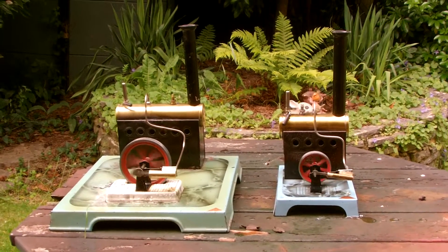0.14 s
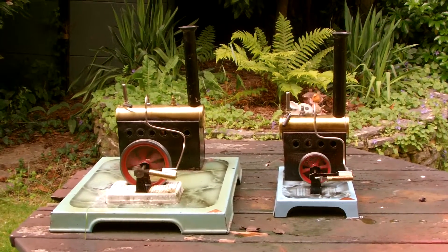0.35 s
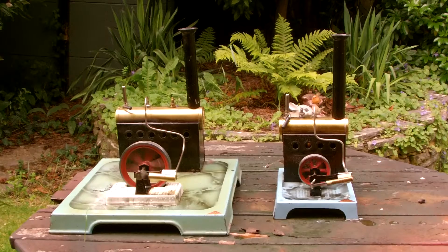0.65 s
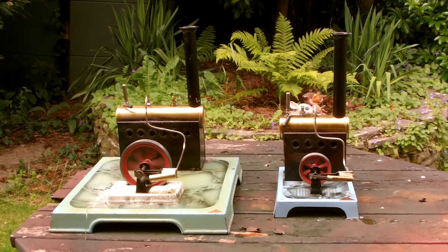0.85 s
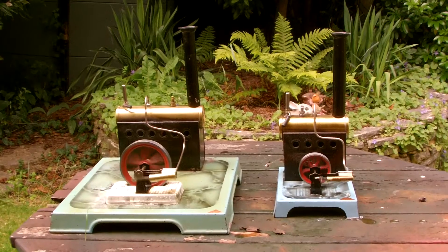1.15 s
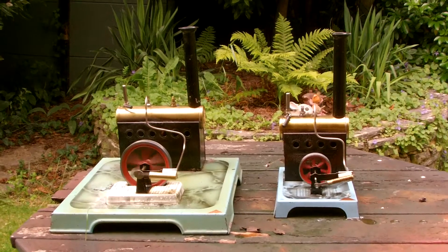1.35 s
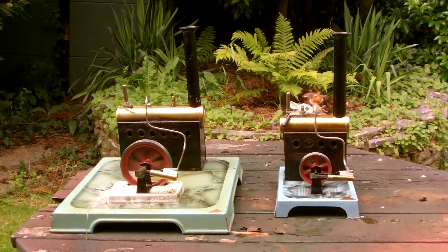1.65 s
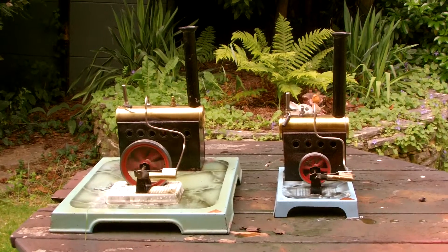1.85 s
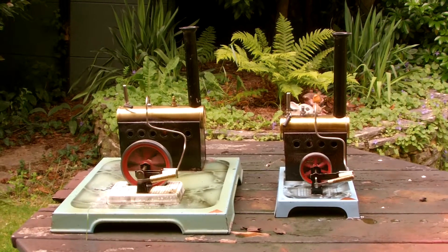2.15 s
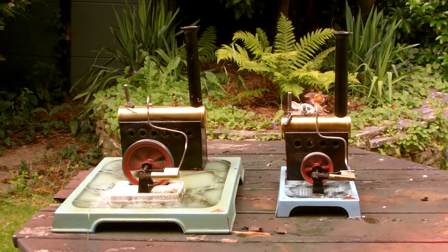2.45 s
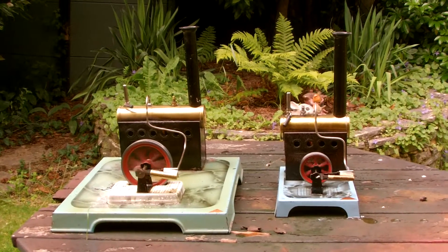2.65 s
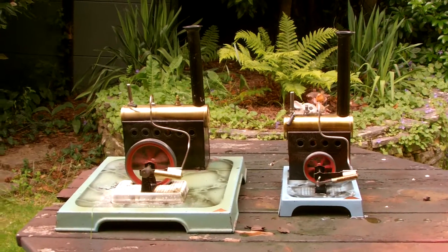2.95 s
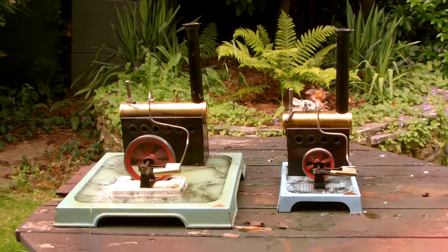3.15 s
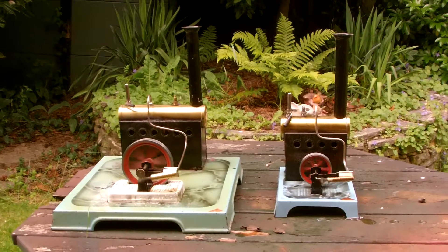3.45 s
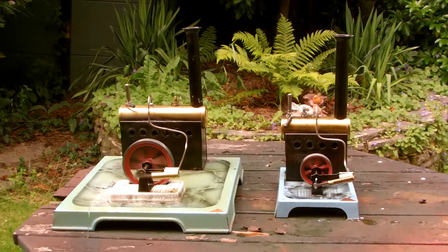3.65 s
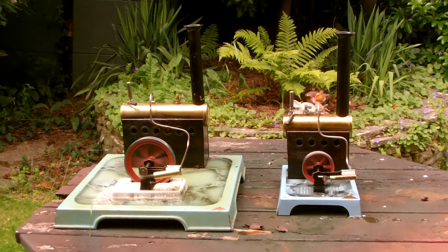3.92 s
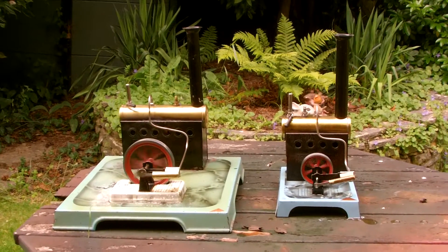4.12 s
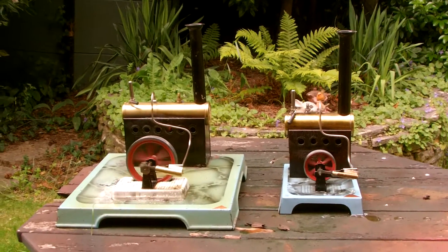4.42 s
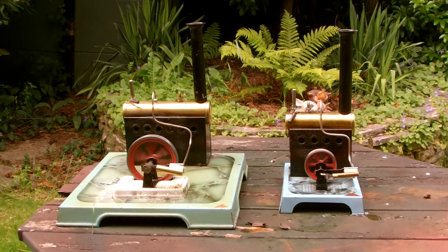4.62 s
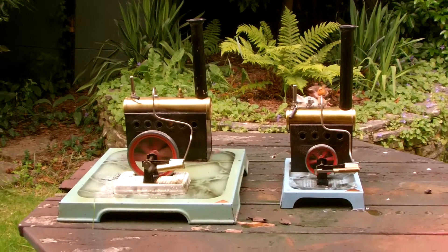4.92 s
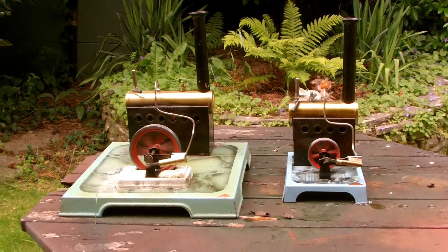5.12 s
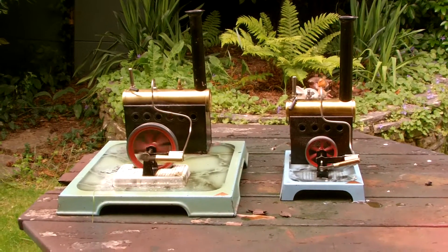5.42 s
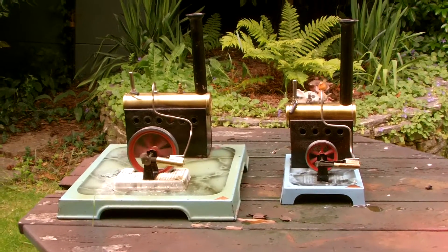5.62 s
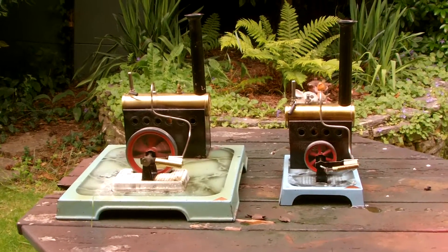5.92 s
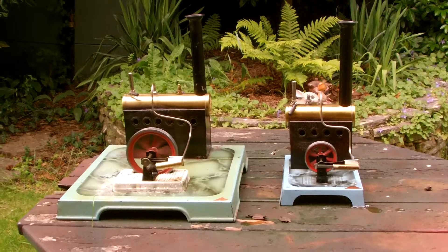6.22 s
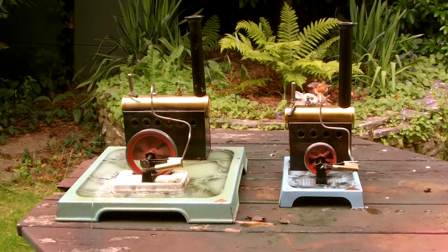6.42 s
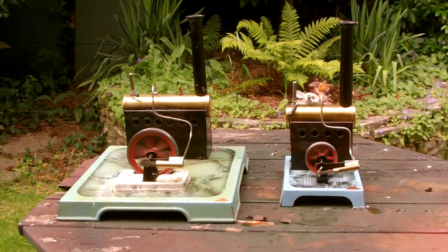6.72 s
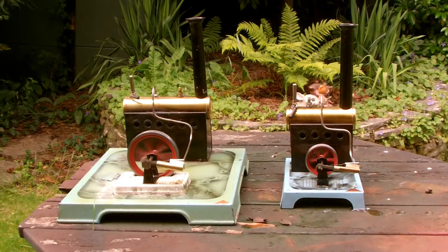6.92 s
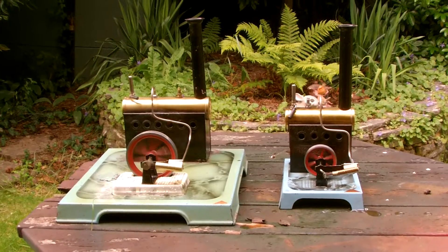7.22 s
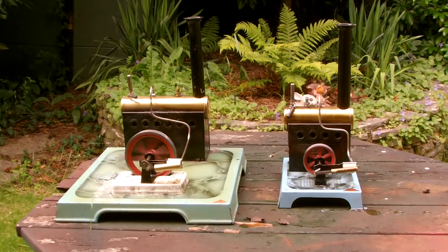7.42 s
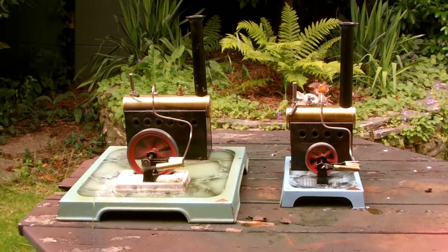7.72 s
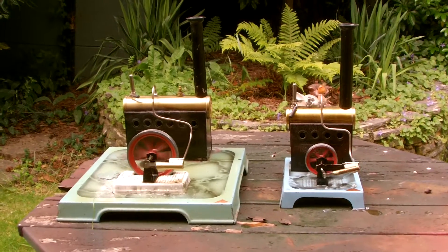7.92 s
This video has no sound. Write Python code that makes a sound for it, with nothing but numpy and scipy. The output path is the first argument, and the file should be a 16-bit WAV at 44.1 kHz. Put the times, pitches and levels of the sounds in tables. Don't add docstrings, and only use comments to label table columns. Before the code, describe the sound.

Rapid metallic chatter of a miniature steam engine on a hollow tin base, about nineteen beats a second, hissing steam, faint garden bird.

```python
import sys
import numpy as np
from scipy import signal
from scipy.fft import rfft, irfft, next_fast_len
from scipy.io import wavfile

SR = 44100
rng = np.random.default_rng(int(sys.argv[2]) if len(sys.argv) > 2 else 0)


def wav_out(sig):
    wavfile.write(sys.argv[1], SR, np.round(np.clip(np.atleast_2d(sig).T, -1, 1) * 32767).astype(np.int16))


def voltage_ratio(decibels):
    exponent = np.asarray(decibels, float) / 20
    return 10 ** exponent


N = 355439

# (time [s], level [dB])
RUMBLE_LEVEL = [(0.0, -71), (0.38, -100), (1.1, -74.5), (1.93, -90), (3.48, -76), (3.7, -78), (4.13, -74),
                (4.27, -72), (5.09, -69.5), (6.22, -75.5), (7.92, -73), (8.06, -89)]
# (frequency [Hz], density [dB/Hz])
RUMBLE_SPECTRUM = [(40, -14), (120, -6), (250, -5), (400, -4), (600, -8), (1000, -30)]
# (frequency [Hz], density [dB/Hz])
AIR_SPECTRUM = [(20, 0), (60, -11), (200, -13.5), (600, -19), (900, -40)]
# (time [s], frequency [Hz], level [dB])
INSECT = [(4.3, 250, -85), (4.48, 250, -73), (4.65, 240, -75), (4.85, 250, -82), (5.1, 252, -71),
          (5.3, 268, -70), (5.45, 255, -79), (5.6, 262, -74), (5.8, 250, -85)]
# (time [s], frequency [Hz], level [dB])
BIRD_NOTES = [
    [(5.34, 2080, -64), (5.37, 2100, -49), (5.41, 2080, -66)],
    [(5.63, 2100, -64), (5.67, 2100, -60), (5.74, 2150, -53), (5.785, 2220, -50)],
    [(5.785, 2400, -58), (5.81, 2160, -47), (5.85, 1890, -58), (5.87, 1800, -66)],
    [(6.1, 2680, -64), (6.115, 2640, -50), (6.145, 2460, -49), (6.19, 2370, -53), (6.25, 2245, -52),
     (6.31, 2130, -55), (6.33, 2100, -77)],
    [(6.745, 2210, -66), (6.77, 2190, -48), (6.825, 2093, -57), (6.86, 2196, -53), (6.92, 2215, -51),
     (6.95, 2200, -66)],
]
BIRD_FLUTTER = [.02, .06, .015, .02, .012]

# (frequency [Hz], density [dB/Hz])
BOILER_SPECTRUM = [(180, -43), (300, -20), (593, -15), (801, 2), (900, -27), (1010, -2), (1970, -14.5),
                   (3580, -19.5), (7200, -18.5), (9880, -21), (16000, -27.5)]
# (time [s], level [dB])
SPIT_EVENT = (2.97, -29)
# (frequency [Hz], density [dB/Hz])
SPIT_SPECTRUM = [(9000, -28), (13000, 2), (16000, -14)]

# (turn number [1], time of pin click [s])
CRANK_PROGRESS = [(0, -.0036), (21, 1.0948), (41, 2.1405), (61, 3.1835), (81, 4.2257), (101, 5.2673),
                  (121, 6.3084), (141, 7.3515), (154, 8.0298)]
# (time of first hard turn [s], hard thud [dB], hard clack [dB], soft thud [dB], soft clack [dB])
BOUNCE_RUNS = [(-.055, -25, -33, -31.5, -43), (.519, -26, -35, -27.5, -44),
               (1.095, -27, -39.5, -30.5, -40.5), (1.618, -25.5, -30.5, -28.5, -45.5),
               (2.036, -26.5, -36.5, -28.5, -40), (2.298, -28.5, -46, -30.5, -51),
               (2.402, -26, -41, -26.5, -44), (2.506, -27, -39, -29.5, -51), (2.611, -26, -38, -29.5, -43),
               (3.027, -27.5, -42, -26.5, -38.5), (3.236, -29, -45, -27, -45), (3.34, -26, -32, -29.5, -56),
               (3.913, -25.5, -35, -31.5, -47), (4.33, -25.5, -30.5, -31.5, -50.5),
               (4.954, -28, -37.5, -26, -41), (5.111, -23.5, -47, -25, -40), (5.215, -26, -33, -24.5, -52),
               (5.58, -24.5, -32.5, -29, -33.5), (5.684, -27, -36.5, -30.5, -71),
               (6.361, -26.5, -37, -25, -43), (6.517, -29, -44, -30, -47), (7.142, -23.5, -34.5, -30, -45),
               (7.404, -23.5, -32.5, -32, -67), (7.822, -25.5, -31, -26, -52)]
# (time [s], extra thud [dB], extra clack [dB])
STUMBLE_TURNS = [(.572, -2.5, -7), (.886, -1, 3), (1.356, 6.5, 10), (1.723, -5, -15), (1.775, -1, 7),
                 (1.879, 2, -7), (1.931, -5, -17), (2.767, -2.5, -12), (2.974, -1, 6), (3.34, -3.5, 0.5),
                 (3.809, 3.5, -5), (3.861, 0.8, -9), (3.913, -3, -0.5), (4.278, 1.1, -24), (4.901, -7, 10),
                 (5.372, -2, 14), (5.476, -6.5, -11), (5.527, -4, -7.5), (5.684, 2, 0), (6.517, -3.5, 7),
                 (6.569, -4, -7), (6.673, 5, 2.1), (6.725, 3.5, 12), (6.829, 1, -19), (7.09, -2, -5),
                 (7.299, -1.5, -22), (7.352, -8.5, -42), (7.404, -4, -3.5), (7.56, -1.5, 20),
                 (8.03, -3.5, 3.5)]
# (time [s], extra puff [dB])
WET_TURNS = [(-.003, 1.5), (.519, 0), (1.148, 1.5), (1.356, 5), (1.67, 4.5), (1.931, 3), (2.193, 1.5),
             (2.558, 7), (3.809, 4.5), (4.434, 3), (4.538, 2.5), (5.267, 4.5), (5.32, 12), (5.423, 4.5),
             (5.632, 2.5), (6.621, 5.5), (6.829, 5.5), (7.09, 4.5), (7.247, 5.5), (7.456, 5), (7.664, 5),
             (7.717, 3.5), (7.978, 4), (8.03, 4)]
# (time [s], knock level [dB])
BEARING_PLAY = [(0, -44), (.52, -54), (.8, -54), (1.12, -44), (1.45, -46), (1.9, -44.5), (2.6, -44),
                (3.2, -45.5), (3.85, -55), (4.2, -46.5), (5.0, -51.5), (5.5, -47.5), (6.3, -49),
                (6.55, -56), (7.0, -49), (7.35, -56), (7.65, -46), (8.06, -51)]
# (time [s], thud [dB], clack [dB], puff [dB], knock [dB])
TURN_CHANCE = [.00006, .7, 1.8, .9, 1.8]
PUFF_DB, PUFF_PER_CLACK_DB, SLACK_PER_CLACK_DB = -37.5, 0.077, 0.3

# (delay after pin click [ms], level [dB], brightness [dB/octave], scatter [dB])
SLACK_CONTACTS = [
    (-7.8, 0, 3, 1.2),
    (-3.7, -3, 7, 1.5),
]
PIN_CONTACTS = [
    (.05, 0, 1.1, 0.99),
]
SLAP_CONTACTS = [
    (4.3, -10, 5.7, 0.8),
    (8.7, -8.5, 1.2, 5.7),
    (12.5, -7, 0.9, 3.5),
    (17.5, -31, 1.9, 3.6),
]
FEET_CONTACTS = [
    (.7, -1.5, 0, 1.3),
    (5.7, -6, -3, 2),
]
SLACK_FEET_CONTACTS = [
    (-9.3, 0, 12, 1.5),
]
KNOCK_WANDER_MS = 0.15

# (frequency [Hz], level [dB], t60 [s])
HOLLOW_MODES = [(443.6, -24.5, 0.05), (547.6, -22.5, 0.057), (666.7, -22.5, 0.096), (761, -8, 0.036),
                (800.2, -0.5, 0.034), (995, -3, 0.031), (1076, -12, 0.059), (1216, -23, 0.045)]
# (frequency [Hz], level [dB], t60 [s])
BED_MODES = [(1266, -16.5, 0.034), (1342, -22.5, 0.044), (1540, -12.5, 0.045), (1665, -10.5, 0.024),
             (1756, -16, 0.021), (2110, -11.5, 0.024), (2357, -14, 0.036), (2505, -29, 0.24)]
# (frequency [Hz], level [dB], t60 [s])
BRASS_MODES = [(3080, -4, .035), (3270, -9, .045), (3533, -1, .06), (3800, -7, .045), (4005, -7, .05),
               (4212, -6, .04), (4420, -12, .05), (4708, -7, .055), (4830, -11, .05), (5035, -6.5, .05),
               (5500, -7, .045), (6018, -6.5, .045), (6172, -9, .05), (6480, -9, .045),
               (7920, -18, 0.12), (8600, -15.5, 0.044), (9730, -4, 0.033), (12300, -24, 0.012)]
# (frequency [Hz], density [dB/Hz])
RATTLE_SPECTRUM = [(500, -30), (1200, 16), (2500, -3.5), (4000, 8.5), (6300, -5.5), (7500, -30),
                   (9000, -72.5)]
# (frequency [Hz], density [dB/Hz])
CLACK_SPECTRUM = [(3000, -16), (6000, 2.5), (7400, -7.5), (8700, 6), (11200, 1), (12500, -2), (15500, -12),
                  (17000, -62)]
# (frequency [Hz], density [dB/Hz])
PUFF_SPECTRUM = [(1500, -16.5), (3000, -15), (5500, -3), (7400, -7), (9000, 4.5), (11200, 4.5),
                 (12500, -7.5), (16000, -8.5)]

# (frequency [Hz], difference re sum [dB])
PORT_DIFFERENCE = [(250, -18), (600, -23), (2400, -21.5), (4400, -14.5), (6800, -11), (10000, -10),
                   (15000, -5)]
# (frequency [Hz], left minus right [dB])
PORT_LEAN = [(2400, 0), (4400, -.6), (8100, -2.2), (15000, -3.5)]


def in_time(rows):
    s, *columns = np.transpose(rows)
    return [np.interp(np.arange(N) / SR, s, c) for c in columns]


def shaped(x, points):
    hz, level_db = np.transpose(points)
    size = next_fast_len(N + 2000, real=True)
    bins_hz = np.maximum(np.fft.rfftfreq(size, 1 / SR), 1)
    gain = voltage_ratio(np.interp(np.log(bins_hz), np.log(hz), level_db))
    return irfft(rfft(x, size) * gain, size)[..., :N]


def noise(points, grain_db=0., channels=1):
    white = rng.standard_normal((channels, N))
    grains = voltage_ratio(grain_db * np.minimum(rng.exponential(1, (channels, N)), 5))
    x = shaped(white * grains, points)
    return x / np.std(x)


def drift(rate_hz):
    knots = rng.standard_normal(int(rate_hz * N / SR) + 2)
    return np.interp(np.arange(N) * rate_hz / SR, np.arange(len(knots)), knots)


def high_pass(x, order, hz):
    return signal.sosfilt(signal.butter(order, hz, "high", fs=SR, output="sos"), x)


def clicks(at_s, sizes):
    lead, train = SR // 10, np.full(N + SR // 5, 1e-18)
    np.add.at(train, np.round(at_s * SR).astype(int) + lead, sizes)
    return train


def ring(train, hz, t60_s, order=1):
    r, w = voltage_ratio(-60 / (t60_s * SR)), 2 * np.pi * hz / SR
    for k in range(order):
        resonance = signal.lfilter([0, np.sin(w)], [1, -2 * r * np.cos(w), r * r], train)
        train = resonance * (2 * np.e * (1 - r)) ** k
    return train[SR // 10:SR // 10 + N]


def burst(at_s, level_db, rise_ms, t60_s):
    rise, fall = np.exp(-1000 / (rise_ms * SR)), voltage_ratio(-60 / (t60_s * SR))
    poles = np.convolve([1, -rise], [1, -fall])
    shape = signal.lfilter([1 - rise], poles, clicks(at_s, voltage_ratio(level_db)))
    return shape[SR // 10:SR // 10 + N]


def struck(modes, blows, shake, wander_ms, order=1):
    out = np.zeros(N)
    late = rng.normal(0, 1, (len(blows[0][0]), 8))
    for hz, mode_db, t60_s in modes:
        train, column = np.pad(shake, SR // 10) * voltage_ratio(mode_db), 0
        for at_s, blow_db, contacts in blows:
            for ms, contact_db, bright_db, scatter_db in contacts:
                chance_db = scatter_db * np.clip(rng.normal(0, 1, len(at_s)), -2, 1.5)
                tilt_db = bright_db * np.log2(hz / 1000)
                level_db = blow_db + contact_db + mode_db + tilt_db + chance_db
                hit_s = at_s + (ms + wander_ms * late[:, column]) / 1000
                train = train + clicks(hit_s, voltage_ratio(level_db))
                column += 1
        out += ring(train, hz, t60_s, order)
    return out


def whistle(rows, warble_hz, depth, rough_db):
    start = (rows[0][0] - .01, rows[0][1], -120)
    end = (rows[-1][0] + .01, rows[-1][1], -120)
    hz, level_db = in_time([start, *rows, end])
    hz = hz * (1 + depth * drift(warble_hz))
    level = np.sqrt(2) * voltage_ratio(level_db + rough_db * drift(warble_hz))
    return level * np.sin(2 * np.pi * np.cumsum(hz) / SR)


def air():
    return voltage_ratio(-68.5) * noise(AIR_SPECTRUM, channels=2)


def far_rumble():
    return voltage_ratio(in_time(RUMBLE_LEVEL)[0] + 5.0) * noise(RUMBLE_SPECTRUM)


def insect():
    return whistle(INSECT, warble_hz=25, depth=.012, rough_db=3)


def bird():
    notes = zip(BIRD_NOTES, BIRD_FLUTTER)
    song = sum(whistle(note, warble_hz=130, depth=depth, rough_db=3.5) for note, depth in notes)
    song = song + 0.48 * np.roll(song, 500) + 0.1 * np.roll(song, 1300)
    return song * voltage_ratio(np.array([[.6], [-.6]]))


def boiler():
    at_s, spit_db = np.array(SPIT_EVENT[:1]), SPIT_EVENT[1]
    spit = burst(at_s, spit_db, rise_ms=.1, t60_s=.008) * noise(SPIT_SPECTRUM, channels=2)
    return voltage_ratio(-48.5 + 0.89 * drift(7.3)) * noise(BOILER_SPECTRUM, grain_db=1.0, channels=2) + spit


def turns():
    number, s = np.transpose(CRANK_PROGRESS)
    turn = np.arange(int(number[-1]) + 1)
    at_s = np.interp(turn, number, s)

    def nearest(table):
        event_s = np.array(table)[:, 0]
        return np.round(np.interp(event_s, [-at_s[1], *at_s], [-1, *turn])).astype(int)

    first = nearest(BOUNCE_RUNS)
    run = np.searchsorted(first, turn, side="right") - 1
    hard = (turn - first[run]) % 2 == 0
    run_levels = np.array(BOUNCE_RUNS)[run]
    levels = np.where(hard[:, None], run_levels[:, 1:3], run_levels[:, 3:5])
    levels[nearest(STUMBLE_TURNS)] += np.array(STUMBLE_TURNS)[:, 1:]
    thud_db, clack_db = levels.T
    firm_db = np.maximum(clack_db + 44, -12)
    puff_db = PUFF_DB + PUFF_PER_CLACK_DB * firm_db
    puff_db[nearest(WET_TURNS)] += np.array(WET_TURNS)[:, 1]
    slack_db = np.interp(at_s, *np.transpose(BEARING_PLAY)) - SLACK_PER_CLACK_DB * firm_db
    regular = np.transpose([at_s, thud_db, clack_db, puff_db, slack_db])
    chance = np.clip(rng.standard_normal(regular.shape), -1.5, 1.5)
    return (regular + np.array(TURN_CHANCE) * chance).T


def hollow_ring(at_s, thud_db, slack_db, shake):
    blows = [(at_s, thud_db - 4.5, FEET_CONTACTS), (at_s, slack_db + 5.0, SLACK_FEET_CONTACTS)]
    grit = rng.standard_normal(N)
    x = struck(HOLLOW_MODES, blows, grit * shake, wander_ms=KNOCK_WANDER_MS, order=2)
    x = high_pass(x, 2, 300)
    return x - 0.21 * signal.lfilter(*signal.iirpeak(890, 5.5, fs=SR), x)


def bed_ring(at_s, steady_db, slack_db, shake):
    blows = [(at_s, slack_db + 7, SLACK_CONTACTS), (at_s, steady_db, PIN_CONTACTS),
             (at_s, steady_db, SLAP_CONTACTS)]
    grit = rng.standard_normal(N)
    return high_pass(struck(BED_MODES, blows, grit * shake * voltage_ratio(12.0), wander_ms=0.082), 4, 900)


def brass_ring(at_s, steady_db, loose_db, rattle):
    blows = [(at_s, steady_db - 24.0, PIN_CONTACTS), (at_s, loose_db - 24, SLAP_CONTACTS)]
    grit = rng.standard_normal(N)
    x = struck(BRASS_MODES, blows, grit * rattle * voltage_ratio(-20.5), wander_ms=.25)
    return high_pass(x, 2, 2000)


def contact_clack(at_s, steady_db, clack_db):
    tick = burst(at_s, steady_db - 15, rise_ms=.2, t60_s=.015)
    clack = burst(at_s + 0.0033, clack_db, rise_ms=0.96, t60_s=0.043)
    return (tick + clack) * noise(CLACK_SPECTRUM, grain_db=-0.5, channels=2)


def exhaust_puff(at_s, puff_db):
    open_s = at_s + 0.022 + rng.normal(0, 0.00083, len(at_s))
    puff = burst(open_s, puff_db + 0.5, rise_ms=2.3, t60_s=0.067)
    return puff * voltage_ratio(2.5 * drift(300)) * noise(PUFF_SPECTRUM, grain_db=2.5, channels=2)


def engine():
    at_s, thud_db, clack_db, puff_db, slack_db = turns()
    steady_db = -34 + 0.093 * (thud_db + 38.0)
    loose_db = -46.0 + 0.58 * (clack_db + 36.0)
    shake = burst(at_s + 0.00089, thud_db - 47, rise_ms=1.4, t60_s=0.052)
    rattle = burst(at_s, steady_db - 8.0, rise_ms=0.18, t60_s=0.018)
    rattle = rattle + burst(at_s + 0.0032, loose_db, rise_ms=1.0, t60_s=0.075)
    ringing = hollow_ring(at_s, thud_db, slack_db, shake)
    ringing = ringing + bed_ring(at_s, steady_db, slack_db, shake)
    ringing = ringing + brass_ring(at_s, steady_db, loose_db, rattle)
    out = ringing * [[1], [.3]]
    out = out + rattle * noise(RATTLE_SPECTRUM, grain_db=2.5, channels=2)
    return out + contact_clack(at_s, steady_db, clack_db) + exhaust_puff(at_s, puff_db)


def ports(direct, scattered):
    side = shaped(scattered, PORT_DIFFERENCE)
    left_lean = [(hz, lean_db / 2) for hz, lean_db in PORT_LEAN]
    right_lean = [(hz, -lean_db / 2) for hz, lean_db in PORT_LEAN]
    return np.array([shaped(direct + side, left_lean), shaped(direct - side, right_lean)])


def scene():
    garden = air() + far_rumble() + insect() + bird()
    return garden + ports(*(boiler() + engine()))


def top_cut(x):
    return signal.sosfilt(signal.butter(12, 16640, fs=SR, output="sos"), x)


def record(dry):
    low_pass = signal.cheby2(12, 50, 16680, fs=SR, output="sos")
    return top_cut(signal.sosfilt(low_pass, dry))


dry = scene()
out = record(dry)
wav_out(out)
```